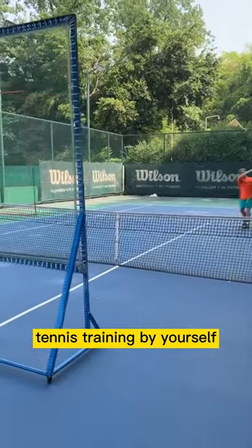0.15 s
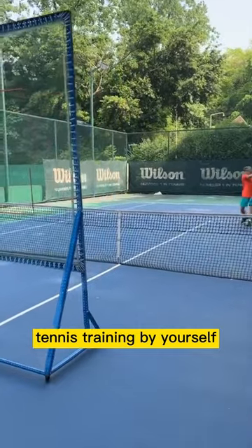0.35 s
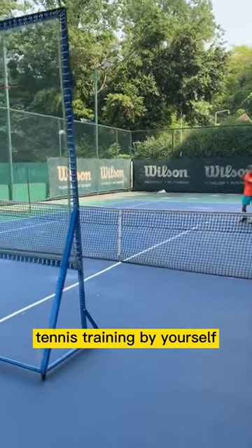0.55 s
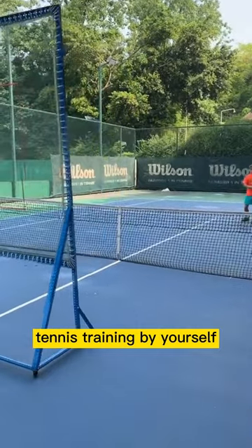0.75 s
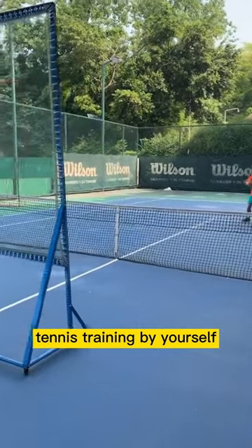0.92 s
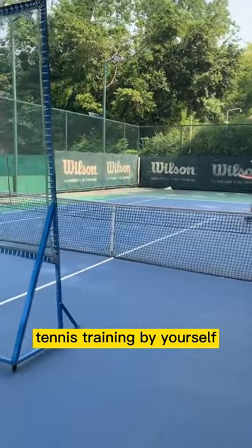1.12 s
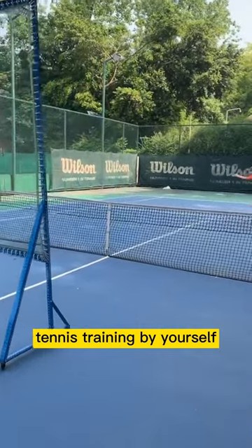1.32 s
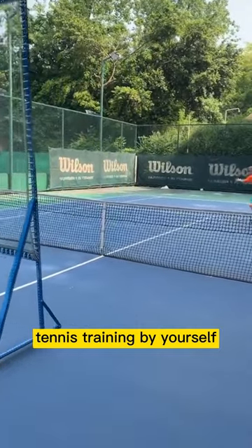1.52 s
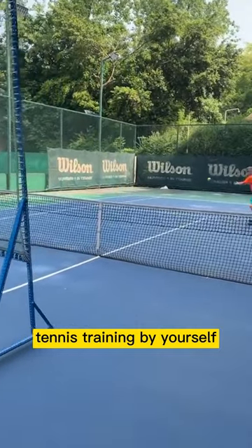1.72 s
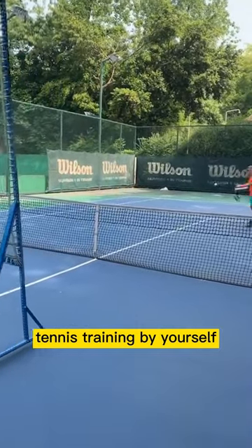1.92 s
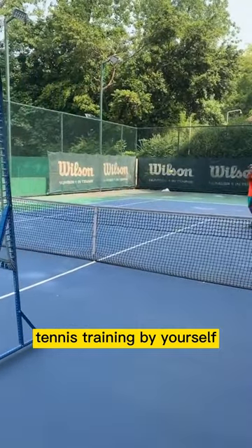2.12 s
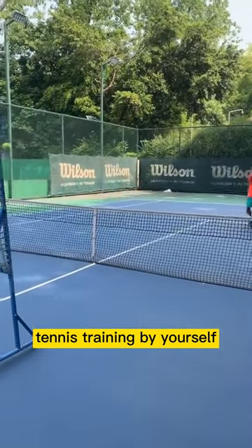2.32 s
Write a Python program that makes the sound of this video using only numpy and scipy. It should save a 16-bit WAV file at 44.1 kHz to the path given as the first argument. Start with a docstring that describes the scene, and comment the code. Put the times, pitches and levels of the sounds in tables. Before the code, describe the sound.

A tennis ball hits a sprung rebound net with a bright metallic rattle, then a racket knock.

```python
"""Far traffic hums, as bands of noise and two drones, under the dying tail of a far racket stroke.
On an outdoor court a tennis ball strikes a sprung rebound net: dense contacts set hooks and springs ringing.
The ball then bounces once and is struck by a racket: cracks and resonances, with short echoes from fences.
Faint swishes of felt and shoes are filtered noise.
A small two-port recorder turns the phase between its channels and ducks after loud sounds."""
import sys
import numpy as np
from scipy import signal
from scipy.fft import rfft, irfft, next_fast_len
from scipy.io import wavfile
from scipy.ndimage import uniform_filter1d

SR = 44100
rng = np.random.default_rng(int(sys.argv[2]) if len(sys.argv) > 2 else 0)


def elevation(decibels):
    """Turn decibel levels (scalar or array-like) into linear amplitude ratios."""
    levels = np.asarray(decibels, float)
    return 10 ** (levels / 20)


def store_pcm(level_fs):
    """Save levels as 16-bit WAV."""
    pcm = np.round(np.clip(level_fs, -1, 1) * 32767).astype(np.int16)
    wavfile.write(sys.argv[1], SR, np.atleast_2d(pcm).T)


N = 103635

# Spectrum of the traffic. Each row: frequency in Hz, relative level in dB per Hz.
TRAFFIC_SPECTRUM = [(20, -42), (32, -16.5), (48, -1), (87, -4), (180, -15.5), (400, -22), (714, -23),
                    (1000, -20.5), (1600, -25.5), (2500, -38), (3400, -33.5), (5000, -41.5), (7000, -56.5),
                    (9000, -68), (11000, -65.5), (13000, -73.5), (17000, -100)]
# Unlike part of left and right. Each row: frequency in Hz, level against the like part in dB.
SIDE_SHARE = [(60, -44), (180, -19), (350, -9), (700, -4.5), (1400, -5.5), (2600, 3), (4200, -56.5),
              (16000, -49.5)]
# Two far engine drones. Each row: time in seconds, rms level of the first in dB, of the second in dB.
DRONE_LEVELS = [(0.0, -65, -31), (0.04, -63, -78), (0.12, -48, -47), (0.23, -37, -53), (0.41, -32.5, -50),
                (0.46, -72, -55), (0.67, -33.5, -86.5), (0.83, -52.5, -66), (0.94, -29.5, -54),
                (1.03, -30.5, -32), (1.08, -45, -81), (1.14, -36.5, -43), (1.35, -50.5, -48),
                (1.38, -36, -44.5), (1.71, -42, -31.5), (1.89, -43, -38), (2.27, -50.5, -36),
                (2.35, -37, -45.5)]
# Centre of each drone's pitch. Each entry: frequency in Hz.
DRONE_HZ = [53.1, 81.36]
# Wander of each drone's pitch. Each entry: rms deviation in Hz.
DRONE_WANDER_HZ = [6.05, 16]
# Blows on the ball: tail of a far racket stroke, bounce, racket.
# Each row: start in seconds, felt crack in dB, tick in dB, hollow ring in dB, low push in dB.
BALL_BLOWS = [(.002, -40, -43, -33.5, -27), (1.3015, -60, -25, -37, -31), (2.024, -28, -36, -9, -16)]
# Spectrum of the felt crack. Each row: frequency in Hz, relative level in dB per Hz.
CRACK_SPECTRUM = [(500, -22), (1500, -4), (3500, -4), (4600, -10), (5700, 5), (6600, -1), (7800, 0),
                  (10000, -5), (13000, -10), (17000, -24)]
# Spectrum of the dying tail of a blow. Each row: frequency in Hz, relative level in dB.
TAIL_SPECTRUM = [(150, 3), (500, -3.5), (1100, -10), (2500, -17), (6000, -27.5), (12000, -43), (17000, -76)]
# Echoes from the fences. Each row: delay in seconds, gain of the bright part in dB, gain of the push in dB.
FENCE_ECHOES = [(.0195, -23, -5), (.036, -14, -4), (.042, -24, -14), (.070, -26, -16), (.076, -19, -10),
                (.081, -24, -12), (.086, -21, -12), (.094, -25, -14)]
# Swishes of felt and shoes. Each row: peak time in seconds, level in dB, rise in seconds, T60 in seconds.
SWISH_SWELLS = [(.05, -61, .02, 0.1), (1.265, -61.5, 0.017, 0.3), (1.31, -63.5, 0.017, .2)]
# Band of the swishes. Each entry: edge frequency in Hz.
SWISH_BAND_HZ = [4985, 13910]
# Jolts of the net frame. Each row: peak time in seconds, level in dB, rise in seconds, T60 in seconds.
FRAME_JOLTS = [(.372, -53, 0.0014, 0.045), (0.387, -56, .012, 0.22), (0.419, -33.5, .022, 0.16),
               (.4365, -13, .007, .12), (.445, -6.5, .013, .15), (.47, -21.5, 0.026, 0.2645),
               (.4212, -21, .001, .03), (.427, -25, .003, .04), (0.551, -26, .012, 0.34),
               (0.689, -47.5, 0.0077, 0.81)]
# The net swings back and the hooks slap tight.
# Each row: peak time in seconds, level in dB, rise in seconds, T60 in seconds.
HOOK_SLAPS = [(.5318, -13, .0005, .06), (.545, -26, .003, .12), (.634, -31, .003, .2),
              (.838, -50, .006, .2)]
# Brightening of the slaps against the jolts. Each row: frequency in Hz, gain in dB.
SLAP_TILT = [(3000, -3.5), (6000, 0), (11000, 0)]
# Spectrum of the metal contacts. Each row: frequency in Hz, relative level in dB per Hz.
CONTACT_SPECTRUM = [(500, -63.5), (1000, -23), (1600, -16.5), (2400, -30.5), (4000, 5.5), (6500, 3),
                    (8500, 1), (11000, 1), (13500, -6), (15500, -10.5), (17000, -46.5)]
# Modes of springs, hooks and the net's frame. Each row: frequency in Hz, relative level in dB, T60 in seconds.
NET_MODES = [(3544, -3, .25), (3674, -9, .3), (3712, -7, .65), (3731, -6, .65), (3748, -9, .7),
             (3820, -13, .2), (4204, -5, .2), (4285, -8, .6), (5804, -8, .06), (6241, -8, .06),
             (6584, -14, .3), (6880, -9, .06), (7058, -6, .07), (7361, -6, .07), (1260, -14, .35),
             (1546, -20, .08), (1800, -16, .08), (2019, -13, .2), (2842, -18, .15), (9512, -12, .12),
             (7929, -10, .05), (10340, -7, .05), (11880, -10, .05)]
# Spectrum of the court's answer. Each row: frequency in Hz, gain in dB.
COURT_SPECTRUM = [(600, -44.5), (900, -20), (1250, -3), (2000, -6.5), (3000, -6), (4000, 7.5), (4700, -29),
                  (8000, -55)]
# Phase between the ports: left leads by 0, 1, 2 .. half turns here. Each entry: frequency in Hz.
HALF_TURN_HZ = [1700, 4800, 7000, 9000, 11050, 13150, 15200, 17300]


def rms_one(x):
    """Normalisation of power: scales a signal to an rms of 1."""
    return x / np.sqrt(np.mean(x ** 2) + 1e-20)


def at_hz(points, hz):
    """Interpolation on a logarithmic frequency axis: reads a table of Hz and dB."""
    table = np.array(points)
    return np.interp(np.log(hz), np.log(table[:, 0]), table[:, 1])


def colour(x, spectrum):
    """Linear filtering: multiplies the spectrum of a signal by a table of Hz and dB."""
    hz = np.arange(N // 2 + 1) * SR / N + 1  # 1 Hz up, clear of log(0)
    return irfft(rfft(x) * elevation(at_hz(spectrum, hz)), N)


def drift(rate_hz):
    """Low-passed noise: two equal poles at rate_hz leave a slow random course of about unit rms."""
    pole = np.exp(-80 * np.pi * rate_hz / SR)  # one point per 40 samples
    noise = rng.standard_normal(N // 40 + 2002)
    slow = signal.lfilter([1], [1, -2 * pole, pole * pole], noise)[2000:]
    return np.interp(np.arange(N) / 40, np.arange(len(slow)), rms_one(slow))


def swell(s, db, rise, t60):
    """Exponential decay: an envelope rises as a square to its peak at s, then loses 60 dB in t60."""
    t = np.arange(N) / SR - s
    decay = elevation(db - 60 * np.maximum(t, 0) / max(t60, 1e-3))
    return decay * np.clip(1 + t / max(rise, 1e-4), 0, 1) ** 2


def ring(clicks, hz, t60):
    """Damped resonance: a unit click sets a decaying sine of initial height 1 ringing in a two-pole mode."""
    r, w = elevation(-60 / (t60 * SR)), 2 * np.pi * hz / SR
    return signal.lfilter([0, np.sin(w)], [1, -2 * r * np.cos(w), r * r], clicks + 1e-18)


def knock(s, hz, db, t60, count=3):
    """Cascaded resonance: a click passed count times through one mode swells before it dies, as in soft contact."""
    click = np.zeros(N)
    click[int(s * SR)] = 1
    for _ in range(count):
        click = ring(click, hz, t60)
    return elevation(db) * click / np.abs(click).max()


def traffic():
    """Partial coherence: half-octave bands of noise, partly unlike left and right, each flicker slightly."""
    TRAFFIC_RMS_DB, FLICKER_DB, FLICKER_HZ = -36, 0.5, 8.9
    mid, side = colour(rng.standard_normal((2, 2, N)), TRAFFIC_SPECTRUM)
    unlike = colour(side, SIDE_SHARE)
    stereo = mid[:, None] + unlike[:, None] * [[1], [-1]]
    edges = 25 * 2 ** np.arange(0, 9.6, 0.5)
    out = 0
    for k, (low, high) in enumerate(zip(edges, edges[1:])):
        band_filter = signal.butter(2, [low, high], "band", fs=SR, output="sos")
        band = signal.sosfilt(band_filter, stereo[k % 2])  # neighbouring bands use separate noises
        out = out + elevation(FLICKER_DB * drift(FLICKER_HZ)) * band
    return elevation(TRAFFIC_RMS_DB) * rms_one(out)


def drones():
    """Frequency modulation: two low sines wander in pitch while their levels swell and fade."""
    WANDER_RATE_HZ = 5.9
    times, *levels = np.transpose(DRONE_LEVELS)
    out = 0
    for db, hz, wander_hz in zip(levels, DRONE_HZ, DRONE_WANDER_HZ):
        pitch = hz + wander_hz * drift(WANDER_RATE_HZ)
        tone = np.sqrt(2) * np.sin(2 * np.pi * np.cumsum(pitch) / SR)
        out = out + elevation(np.interp(np.arange(N) / SR, times, db)) * tone
    return out


def fence_echoes(bright, push):
    """Specular reflection: delayed, weaker copies return, the bright part dulled by a low-pass."""
    ECHO_CUT_HZ = 4000
    dull = signal.sosfilt(signal.butter(2, ECHO_CUT_HZ, fs=SR, output="sos"), bright)
    out = 0
    for delay, bright_db, push_db in FENCE_ECHOES:
        reflected = elevation(bright_db) * dull + elevation(push_db) * push
        out = out + np.pad(reflected, (int(delay * SR), 0))[:N]
    return out


def ball():
    """Impact excitation: felt noise, a tick, the hollow shell's mode and a low push, then echoes and a tail."""
    CRACK_LENGTH_S, CRACK_T60_S = 0.003, 0.016
    TICK_HZ, TICK_T60_S = 2600, 0.0006  # T60 here and below is that of one pass through the mode
    SNAP_DB, SNAP_LATE_S = -20, 0.0068  # shell snaps back at the top of its ring; dB against the ring
    BALL_HZ, BALL_T60_S, BALL_LATE_S = 1130, 0.0053, 0.0041
    PUSH_HZ, PUSH_T60_S, PUSH_LATE_S = 270, 0.007, 0.0052
    TAIL_DB, TAIL_T60_S = -10.5, 0.56  # dB against the push
    felt = rms_one(colour(rng.standard_normal(N), CRACK_SPECTRUM))
    wash = rms_one(colour(rng.standard_normal(N), TAIL_SPECTRUM))
    bright = push = tail = 0
    for s, crack_db, tick_db, ring_db, push_db in BALL_BLOWS:
        half = CRACK_LENGTH_S / 2
        crack = felt * swell(s + half, crack_db, half, CRACK_T60_S)
        tick = knock(s, TICK_HZ, tick_db, TICK_T60_S)
        snap = knock(s + SNAP_LATE_S, TICK_HZ, ring_db + SNAP_DB, TICK_T60_S)
        hollow = knock(s + BALL_LATE_S, BALL_HZ, ring_db, BALL_T60_S, count=5)
        bright = bright + crack + tick + snap + hollow
        push = push + knock(s + PUSH_LATE_S, PUSH_HZ, push_db, PUSH_T60_S)
        tail = tail + wash * swell(s + 0.0072, push_db + TAIL_DB, 0.0017, TAIL_T60_S)
    return bright + push + tail + fence_echoes(bright, push)


def swishes():
    """Friction noise: felt and shoes give short puffs of band-passed treble."""
    band_filter = signal.butter(2, SWISH_BAND_HZ, "band", fs=SR, output="sos")
    hiss = signal.sosfilt(band_filter, rng.standard_normal(N))
    return hiss * sum(swell(*row) for row in SWISH_SWELLS)


def metal_contacts():
    """Random impulse train: dense clicks of either sign, exponentially spread in dB, at unit rms."""
    CONTACTS_PER_S, CONTACT_SPREAD_DB = 14000, 2.5
    sizes = elevation(CONTACT_SPREAD_DB * np.minimum(rng.exponential(1, N), 5)) * rng.choice([-1, 1], N)
    return rms_one(sizes * (rng.random(N) < CONTACTS_PER_S / SR))


def mode_rings(driven):
    """Modal synthesis: the clicks excite every mode of springs, hooks and frame with random strength."""
    MODE_SPREAD_DB = 2.0
    out = 0
    for hz, db, t60 in NET_MODES:
        struck = driven * elevation(MODE_SPREAD_DB * rng.standard_normal(N))
        energy_root = np.sqrt(t60 * SR / 28)  # evens out the energy of long and short rings
        out = out + elevation(db) * ring(struck, hz, t60) / energy_root
    return out


def court_answer(driven):
    """Diffuse reverberation: convolution with decaying coloured noise, independent left and right."""
    COURT_DB, COURT_T60_S = -4, 0.55
    noise = colour(rng.standard_normal((2, N)), COURT_SPECTRUM)
    energy_root = np.sqrt(COURT_T60_S * SR / 14)
    answer = noise * swell(0.008, COURT_DB, 0.01, COURT_T60_S) / energy_root
    return signal.fftconvolve(driven[None], answer, axes=1)[:, :N]


def net():
    """Source and resonator: jolts and slaps drive metal contacts, heard bare, through modes and from the court."""
    UNEVEN_DB, UNEVEN_HZ = 2.0, 40
    SLAP_RING_DB, RING_DB = -8, -12
    shake = np.sqrt(sum(swell(*row) ** 2 for row in FRAME_JOLTS))
    shake = shake * elevation(UNEVEN_DB * drift(UNEVEN_HZ))
    slap = np.sqrt(sum(swell(*row) ** 2 for row in HOOK_SLAPS))
    clicks = metal_contacts()
    jolt_clatter = shake * rms_one(colour(clicks, CONTACT_SPECTRUM))
    slap_noise = rms_one(colour(clicks[::-1], CONTACT_SPECTRUM))  # reversed, unlike the jolts
    slap_clatter = slap * colour(slap_noise, SLAP_TILT)
    driven = np.hypot(shake, elevation(SLAP_RING_DB) * slap) * clicks
    return jolt_clatter + slap_clatter + elevation(RING_DB) * mode_rings(driven) + court_answer(driven)


def scene():
    """Superposition: traffic, drones, ball, swishes and net add linearly."""
    return traffic() + drones() + ball() + swishes() + net()


def turn_phase(dry):
    """All-pass dispersion: the ports are turned oppositely, so left leads more towards the treble."""
    size = next_fast_len(N + 2048)
    hz = np.arange(size // 2 + 1) * SR / size
    lead = np.pi / 2 * np.interp(hz, HALF_TURN_HZ, np.arange(len(HALF_TURN_HZ)))  # half for each port
    return irfft(rfft(dry, size) * np.exp(1j * lead * [[1], [-1]]), size)[:, :N]


def duck(x):
    """Dynamic compression: a held level above the threshold lowers the gain, and falls back steadily."""
    HEARS_ABOVE_HZ, THRESHOLD_DB, DUCK_DB_PER_DB = 300, -42, 0.25
    HELD_FALL_DB_PER_S, SMOOTHING_S = 108.5, 0.021
    heard = signal.sosfilt(signal.butter(2, HEARS_ABOVE_HZ, "high", fs=SR, output="sos"), x)
    power = uniform_filter1d(np.mean(heard ** 2, axis=0), size=441)  # 10 ms mean
    level_db = 10 * np.log10(power + 1e-12)
    ramp = HELD_FALL_DB_PER_S * np.arange(N) / SR
    held_db = np.maximum.accumulate(level_db + ramp) - ramp
    over_db = np.maximum(held_db - THRESHOLD_DB, 0)
    r = np.exp(-1 / (SMOOTHING_S * SR))
    return x * elevation(-DUCK_DB_PER_DB * signal.lfilter([1 - r], [1, -r], over_db))


def roll_off(x):
    """The treble ends steeply here."""
    return signal.sosfilt(signal.butter(12, 16390, fs=SR, output="sos"), x)


def record(dry):
    """Two-port reception: the phase turn between the ports comes first, then the common gain control."""
    mix = duck(turn_phase(dry))
    return roll_off(mix)


dry = scene()
out = record(dry)
store_pcm(out)
```